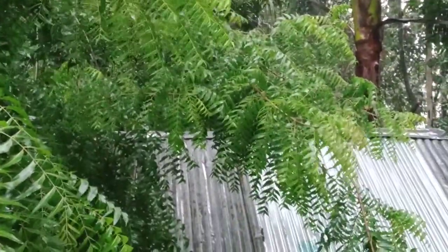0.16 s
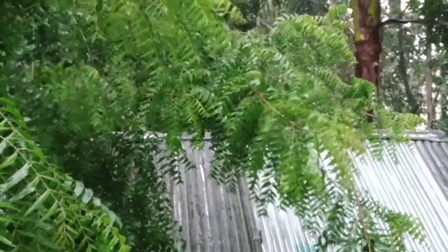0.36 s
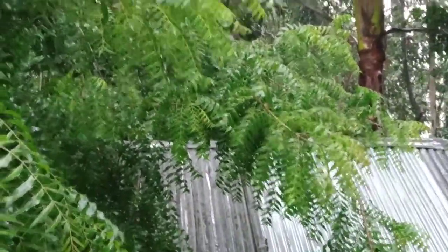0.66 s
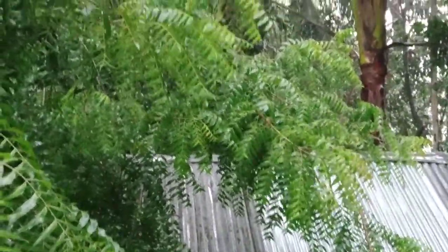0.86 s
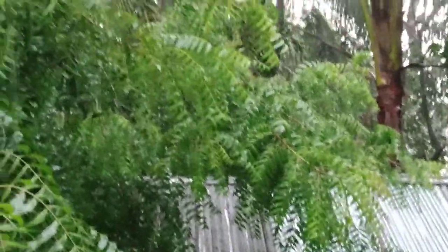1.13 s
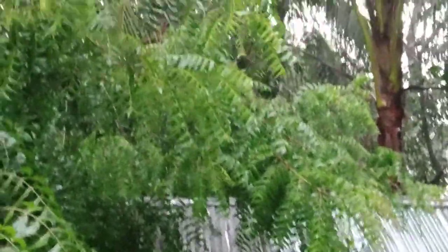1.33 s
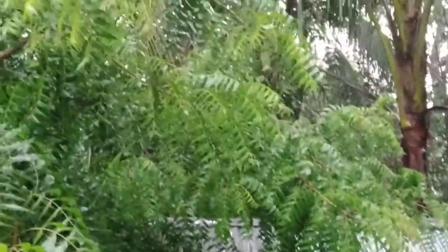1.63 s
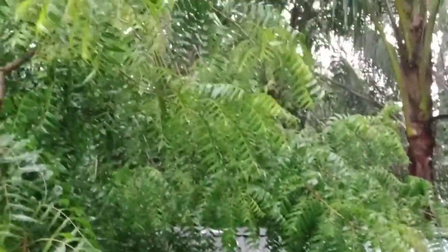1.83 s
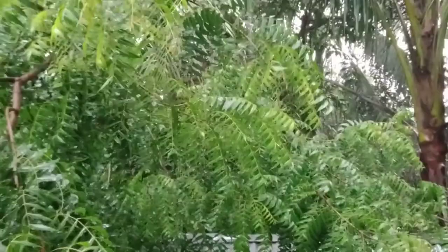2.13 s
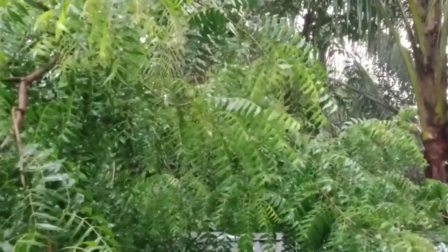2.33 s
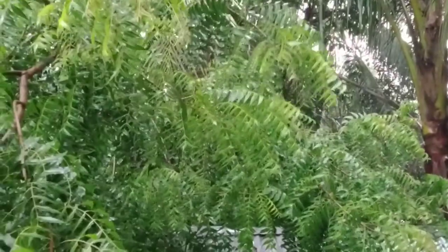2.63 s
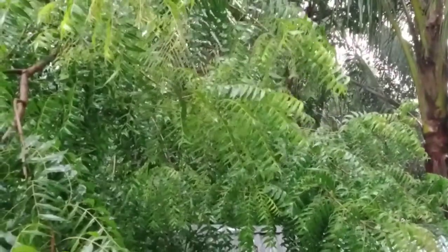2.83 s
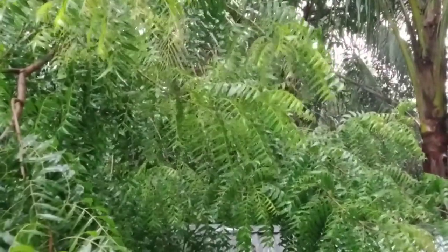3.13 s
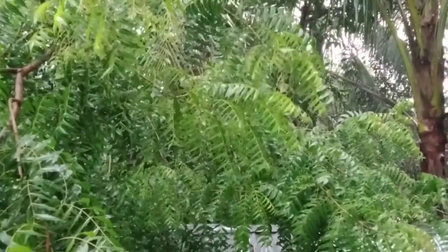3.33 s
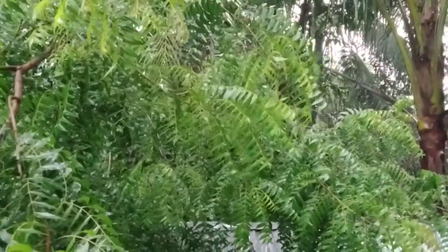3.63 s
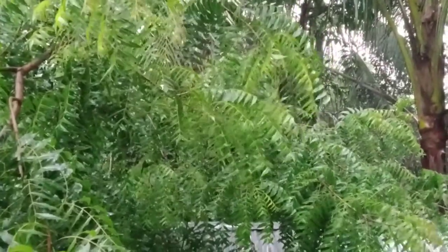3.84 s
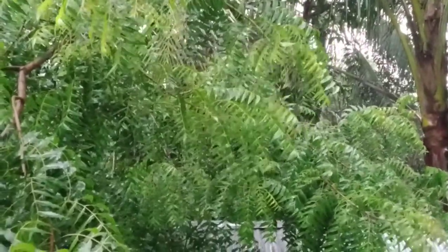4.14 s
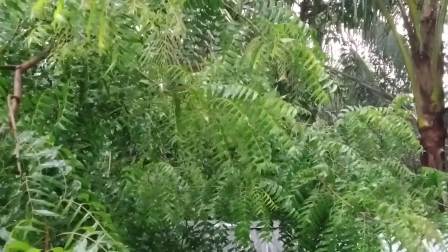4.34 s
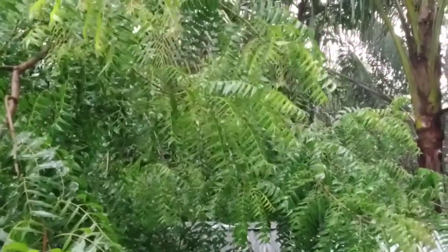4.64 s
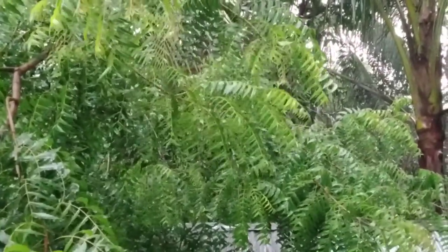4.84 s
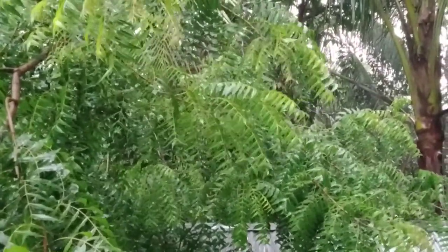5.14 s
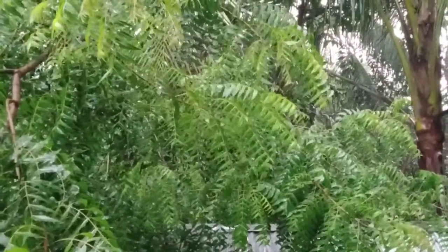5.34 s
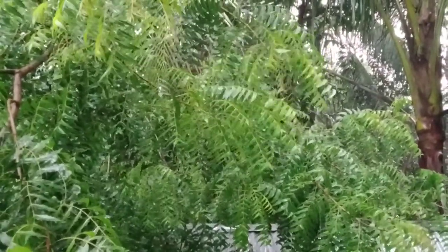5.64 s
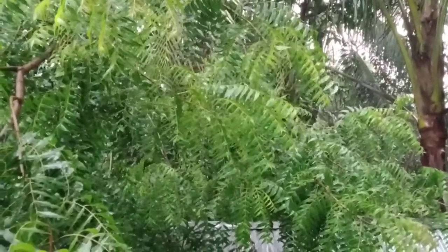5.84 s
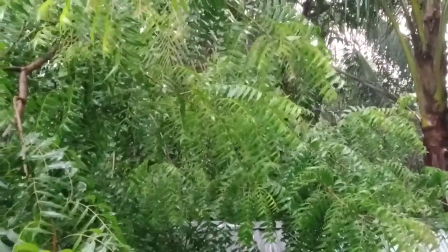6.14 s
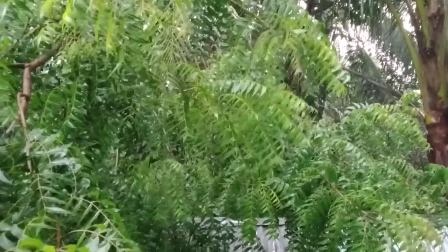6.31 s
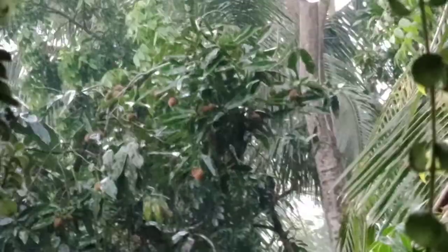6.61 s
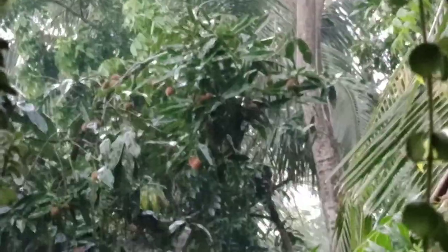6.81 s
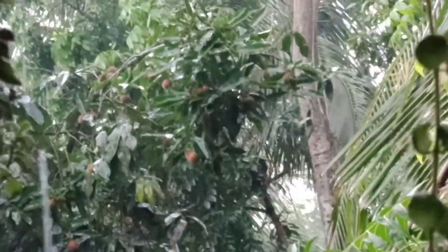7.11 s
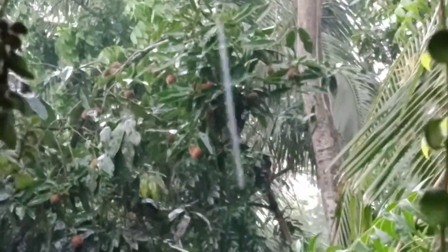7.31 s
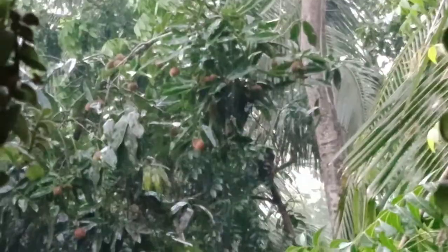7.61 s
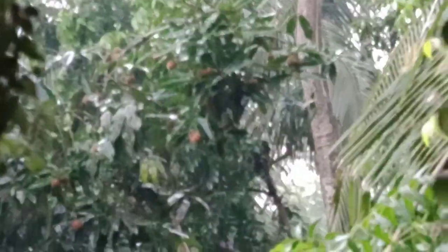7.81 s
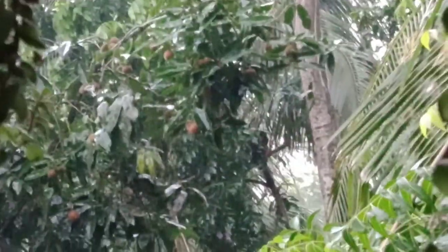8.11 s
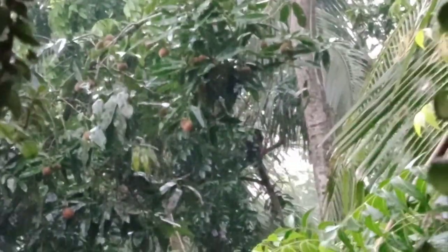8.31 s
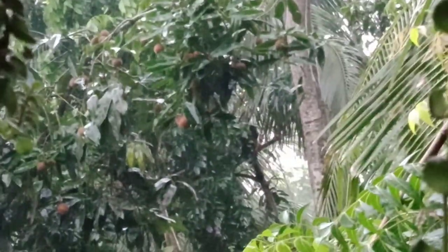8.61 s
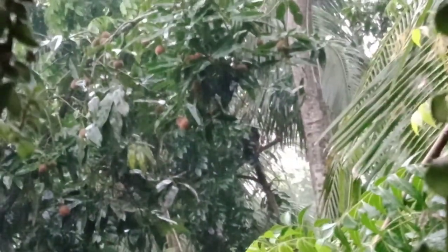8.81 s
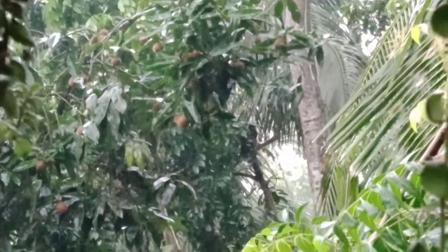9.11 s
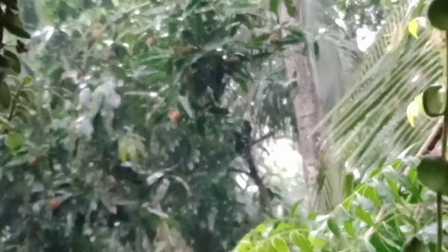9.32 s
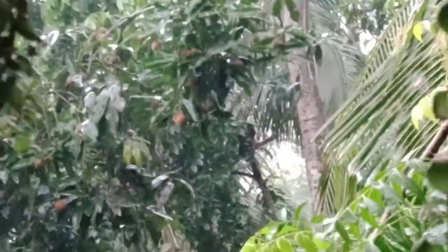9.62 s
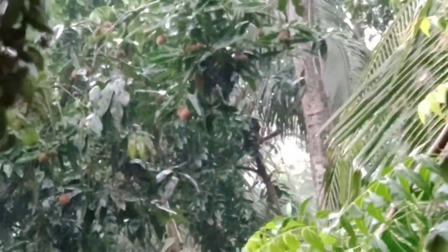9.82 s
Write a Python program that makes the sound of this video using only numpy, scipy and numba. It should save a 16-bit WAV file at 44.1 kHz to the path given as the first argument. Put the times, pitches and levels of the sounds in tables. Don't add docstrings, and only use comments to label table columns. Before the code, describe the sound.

Heavy rain hisses and patters over leaves and a tin roof while thunder booms and rolls, then a cut to closer rain.

```python
import sys
import numpy as np
from scipy import signal
from scipy.fft import rfft, irfft
from scipy.io import wavfile
from scipy.ndimage import uniform_filter1d
from numba import njit

SR = 44100
rng = np.random.default_rng(int(sys.argv[2]) if len(sys.argv) > 2 else 0)


def makeup_ratio(level_db):
    decades = np.asarray(level_db, float) / 20
    return 10 ** decades


def persist_wave(psi):
    counts = np.round(np.clip(psi, -1, 1) * 32767).astype(np.int16)
    wavfile.write(sys.argv[1], SR, np.atleast_2d(counts).T)


N = 439236
SPLICE_S = 6.5012


def noise():
    return rng.standard_normal(N)


def unit(x):
    return x / np.sqrt(np.mean(x ** 2))


def colour(x, points):
    hz, db = np.transpose(points)
    bin_hz = np.arange(4097) * SR / 8192
    log_gain = np.interp(np.log(bin_hz + 1), np.log(hz), db) * np.log(10) / 20
    cepstrum = irfft(log_gain)
    cepstrum[1:4096] *= 2
    cepstrum[4097:] = 0
    response = irfft(np.exp(rfft(cepstrum)))
    return signal.fftconvolve(x, response)[:N]


def level_curve(tables):
    t = np.arange(N) / SR
    first, second = [np.interp(t, *np.transpose(table)) for table in tables]
    return np.where(t < SPLICE_S, first, second)


def walk(rate):
    hold = int(SR / rate)
    steps = np.repeat(rng.standard_normal(N // hold + 1), hold)
    smooth = uniform_filter1d(uniform_filter1d(steps, hold), hold)
    return unit(smooth[:N])


def shape(start_s, hold_s, attack_s, release_s):
    t = np.arange(N) / SR - start_s
    rise = np.clip(t / attack_s, 0, 1)
    return rise * np.exp(-np.clip(t - attack_s - hold_s, 0, None) / release_s)


@njit
def grains(start, hz, cycles, size, sr, length):
    out = np.zeros(length)
    for k in range(len(start)):
        turn = np.exp(2j * np.pi * hz[k] / sr - hz[k] / (cycles[k] * sr))
        z = size[k] + 0j
        end = min(length, start[k] + int(6 * cycles[k] * sr / hz[k]))
        for i in range(start[k], end):
            z *= turn
            out[i] += z.imag
    return out


def shower(count, low_hz, high_hz, cycles, spread_db):
    when, pitch, ring, big = rng.random((count, 4)).T
    start = (when * N).astype(np.int64)
    hz = low_hz * (high_hz / low_hz) ** pitch
    size = makeup_ratio(-spread_db * np.log(1 - big)) * hz * np.sign(ring - 0.5)
    return unit(grains(start, hz, cycles * (0.5 + ring), size, 1.0 * SR, N))


def bands(x, lowest_hz, count, shared_db, own_db):
    spectrum = rfft(x)
    octave = np.log2(np.arange(N // 2 + 1) * SR / N / lowest_hz + 1e-9)
    octave = np.clip(octave, 0, count - 1)
    gust = walk(28)
    gust = gust - uniform_filter1d(gust, size=SR // 5)
    out = 0
    for k in range(count):
        part = irfft(spectrum * np.clip(1 - abs(octave - k), 0, 1), N)
        out = out + part * makeup_ratio(shared_db * gust + own_db * walk(13))
    return out


def rain():
    # (t/s, level/dB)
    rain_levels = [
        [(0, -35.5), (2.53, -36), (2.73, -38), (3.87, -40), (4.05, -41.5), (4.66, -42.5), (4.76, -40),
         (5.02, -36), (5.44, -38), (5.6, -39.5), (6.31, -39), (6.36, -35.5)],
        [(6.5, -27.5), (7.3, -31.5), (8.4, -32.5), (9.05, -30), (9.2, -31.5), (9.96, -29)],
    ]
    # (f/Hz, level/dB per Hz)
    patter_tones = [
        [(60, -28), (200, 3), (400, -0.5), (800, 1.5), (1400, -1), (2000, 0.5), (3000, -3), (4000, -6.5)],
        [(60, -10), (200, 0), (400, -1), (800, 0.5), (1400, -1), (2000, -0.5), (3000, -3), (4000, -4)],
    ]
    # (t/s, hold/s, depth/dB)
    ducks = [
        (2.53, .15, -6),
        (2.605, 0.062, -4),
        (3.88, 0.12, -3),
        (5.44, 0.034, -4),
    ]
    # (first spot/dB, second spot/dB)
    spray_levels = (3.5, -1)
    spray_fade_db_per_s = -0.01
    t = np.arange(N) / SR
    first_spot = t < SPLICE_S

    near = shower(count=60000, low_hz=152.0, high_hz=16400, cycles=1.35, spread_db=1.56)
    pour = bands(makeup_ratio(-8.0) * near + noise(), 250, count=7, shared_db=0.76, own_db=0.63)
    pour = np.where(first_spot, *[unit(colour(pour, tone)) for tone in patter_tones])

    treble = signal.butter(4, 4600, "high", fs=SR, output="sos")
    spray = signal.sosfiltfilt(treble, pour)
    spray_db = np.where(first_spot, spray_levels[0] + spray_fade_db_per_s * t, spray_levels[1])
    body = unit(pour - spray)

    duck_db = sum(db * shape(s, hold, attack_s=0.021, release_s=0.021) for s, hold, db in ducks)
    return makeup_ratio(level_curve(rain_levels) + duck_db + 4.5) * (body + makeup_ratio(spray_db) * unit(spray))


def drops(splash_s=0.013, body_s=0.006, rise_s=0.0025):
    # (t/s, bright tick peak/dB,
    # # splash/dB)
    large_drops = [(0.001, -53.5, -38), (0.138, -55, -54), (0.3984, -53.5, -43), (0.9626, -61, -44),
                   (1.1144, -50, -40), (1.3974, -54.5, -50), (1.8798, -58, -48), (2.2933, -51, -52),
                   (2.5215, -57, -39), (2.8404, -62, -43), (3.7744, -63, -54), (3.8526, -61.5, -51),
                   (4.133, -70, -53), (4.1878, -57.5, -48), (4.6832, -55.5, -49), (5.809, -60, -41),
                   (6.0621, -63.5, -42.5), (7.1044, -58, -40), (7.4086, -58, -32.5), (7.84, -54, -48),
                   (7.9165, -56, -35), (8.226, -59, -43), (8.7552, -58, -41), (8.9806, -55, -33),
                   (9.0647, -62, -45), (9.191, -60, -42), (9.3144, -58, -41), (9.428, -63, -45),
                   (9.6729, -55, -39)]
    dull_band = signal.butter(2, [1400, 4400], "band", fs=SR, output="sos")
    fine_band = signal.butter(2, [4500, 7500], "band", fs=SR, output="sos")
    bright_band = signal.butter(4, 7600, "high", fs=SR, output="sos")
    out = np.zeros(N)
    t = np.arange(2600) / SR
    fade = np.exp(-t / splash_s) * (1 - np.exp(-t / rise_s))
    for s, tick_db, splash_db in large_drops:
        fine, dull, bright = rng.standard_normal((3, len(t)))
        fine = makeup_ratio(splash_db + 20.5) * signal.sosfilt(fine_band, fine)
        bright = makeup_ratio(tick_db + 37.0) * signal.sosfilt(bright_band, bright)
        dull = makeup_ratio(splash_db + 18.0) * signal.sosfilt(dull_band, dull)
        start = int(s * SR)
        out[start:start + len(t)] += (fine + bright) * fade + dull * np.exp(-t / body_s)
    return out


def peal():
    # (t/s, level/dB)
    rumble_levels = [
        [(0, -29.5), (1.9, -33), (2.5, -28.5), (6.36, -26)],
        [(6.5, -30), (7.1, -31), (7.6, -29), (8.3, -32), (9.3, -34), (9.96, -40)],
    ]
    # (boom/dB, knock/dB, deep roll/dB, crackle/dB)
    rumble_mix = (0, -2.5, -5.5, -9)
    # (t/s, hold/s, level/dB, knock over boom/dB, crackle over boom/dB)
    claps = [(2.542, 0.066, -15, 1, -11.5), (2.68, .3, -21.5, -0.5, -7), (3.024, .2, -20.5, -1.5, -8),
             (3.296, .04, -17.5, -1, -12), (3.343, 0.087, -17, -1, -8), (3.486, 0.083, -23.5, -4, -7),
             (3.684, 0.067, -26, 0.5, -4), (3.79, .1, -15, -2, -5), (3.914, 0.055, -18, 3.5, -7),
             (4.002, .03, -15.5, 0.5, -11), (4.088, 0.035, -20.5, -1.5, -4),
             (4.163, 0.068, -17.5, -1.5, -7), (4.288, 0.41, -26, 1.5, -5.5), (4.733, 0.068, -22.5, -6, -11),
             (4.837, 0.12, -22.5, 0.5, -10.5), (4.977, 0.28, -17, -4.5, -15), (5.298, .14, -15, -2, -10.5),
             (5.468, 0.089, -17.5, -1, -9), (5.588, 0.15, -17.5, -1.5, -7.5),
             (5.758, 0.038, -15.5, -3, -11.5), (5.855, .08, -18, -1, -8.5), (5.997, 0.065, -28, 1, -12),
             (6.108, 0.06, -22.5, -4, -9), (6.272, 0.064, -22.5, -4, -7.5)]
    roll_under_boom_db, tumble_db, tumble_per_s = -18.5, 1.0, 18

    power = makeup_ratio(level_curve(rumble_levels) + np.array(rumble_mix)[:, None]) ** 2
    for s, hold, db, knock_db, crackle_db in claps:
        mix = makeup_ratio(db + np.array([0, knock_db, roll_under_boom_db, crackle_db]))
        envelope = shape(s, hold, attack_s=0.011, release_s=0.071)
        power = power + (mix[:, None] * envelope) ** 2
    return [np.sqrt(p) * makeup_ratio(tumble_db * walk(tumble_per_s)) for p in power]


def thunder():
    # (f/Hz, level/dB per Hz)
    boom_tone = [(60, -31), (95, -5), (120, -3), (150, -0.5), (180, -9.5), (300, -43)]
    knock_tone = [(100, -41.5), (155, -5), (190, 3.5), (225, -1.5), (270, -13), (420, -35)]
    roll_tone = [(20, -37.5), (35, -29.5), (50, -21), (75, -2), (90, 11), (110, -14), (160, -43.5)]
    crackle_tone = [(150, -17), (250, 1), (340, -3), (500, -9.5), (750, -18), (1100, -28.5), (2000, -56)]
    *bass_gains, crackle_gain = peal()

    fronts = shower(count=3000, low_hz=41.0, high_hz=295, cycles=1.09, spread_db=1.5)
    fronts = fronts + unit(colour(noise(), [(300, 4.0), (600, -43.5)]))
    bass = 0
    for gain, tone in zip(bass_gains, (boom_tone, knock_tone, roll_tone)):
        bass = bass + gain * unit(colour(fronts, tone))

    crackle = shower(count=8000, low_hz=178.4, high_hz=1470, cycles=1.16, spread_db=0.7)
    return bass + crackle_gain * makeup_ratio(0.5) * unit(colour(crackle, crackle_tone))


def scene():
    return (rain() + drops() + thunder())[None]


def low_pass(x):
    return signal.sosfilt(signal.butter(12, 15720, fs=SR, output="sos"), x)


def record(dry):
    # (f/Hz, gain/dB)
    mic_tone = [(20, -16), (45, -0.5), (60, 1), (3900, 0.5), (4400, -3.5), (5000, -10.5), (6600, -15.5),
                (7200, -24), (7900, -32.5), (8800, -35.5), (11500, -38.5), (12500, -44.5), (14000, -50.5),
                (15500, -58.5)]
    jumps = (-.08, -.07, .018)
    dropout_s, return_s = 6.3617, 6.4687
    t = np.arange(N) / SR

    sound = colour(dry[0], mic_tone)
    sound = np.tanh(1.086 * sound) / 1.126
    sound = sound + makeup_ratio(-94.5) * noise()

    after = np.clip(t - dropout_s, 0, 1)
    residue = colour(sound, [(500, 0), (1500, -14), (6000, -25)])
    residue = residue * makeup_ratio(-43 - 550 * after) * (after < 0.038)

    sound = sound - 0.05 * np.exp(-t / 0.0002)
    for s, jump in zip((dropout_s, return_s), jumps):
        sound = sound + (jump - sound[int(s * SR)]) * np.exp(-((t - s) / 0.0006) ** 2)
    sound = sound + jumps[2] * (t > SPLICE_S) * np.exp(-abs(t - SPLICE_S) / 0.001)
    sound = np.where((t > dropout_s) & (t < return_s), residue, sound)
    return low_pass(sound[None])


dry = scene()
out = record(dry)
persist_wave(out)
```